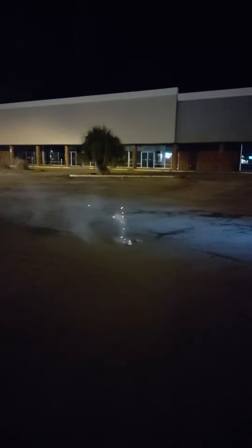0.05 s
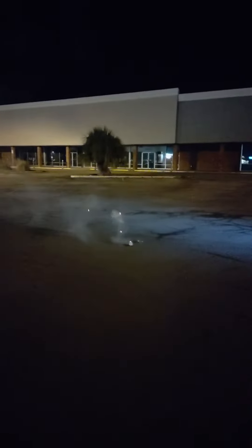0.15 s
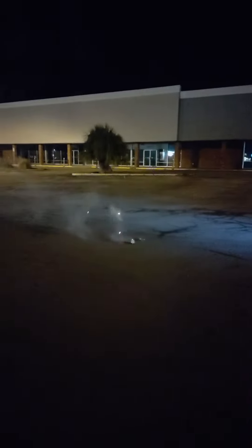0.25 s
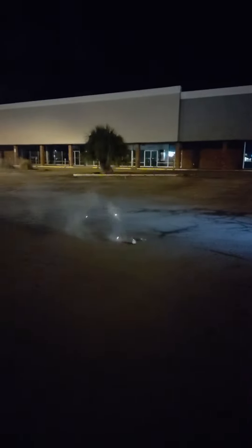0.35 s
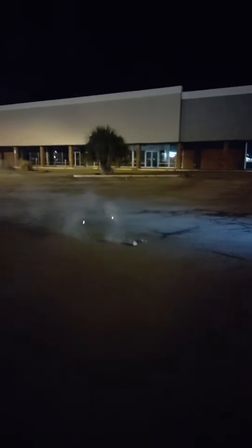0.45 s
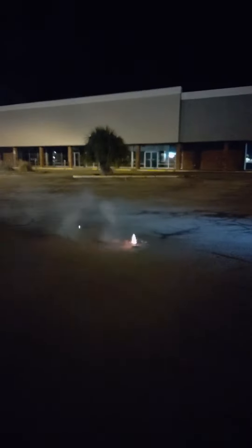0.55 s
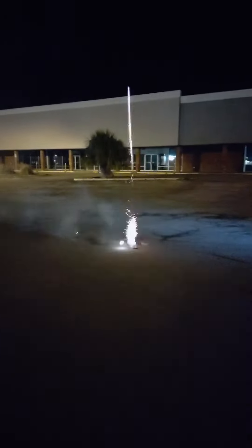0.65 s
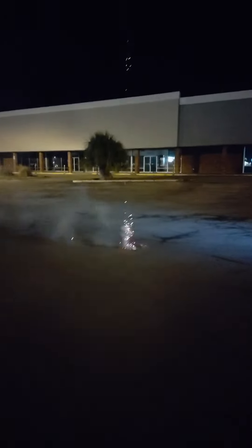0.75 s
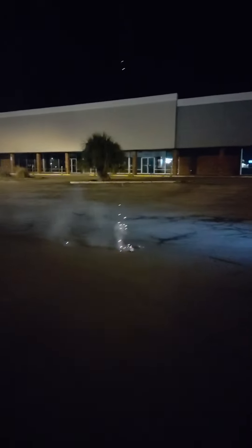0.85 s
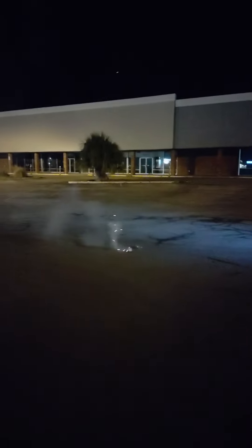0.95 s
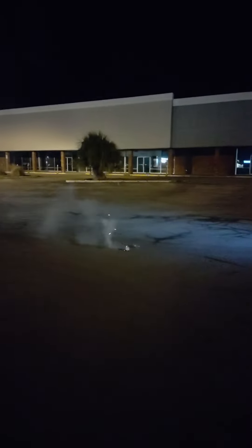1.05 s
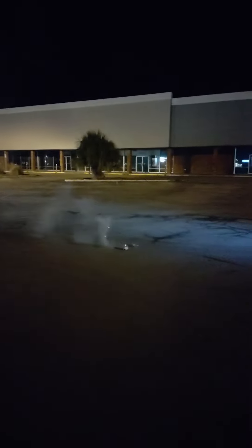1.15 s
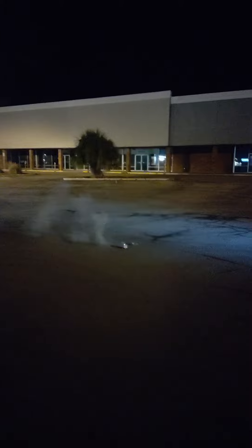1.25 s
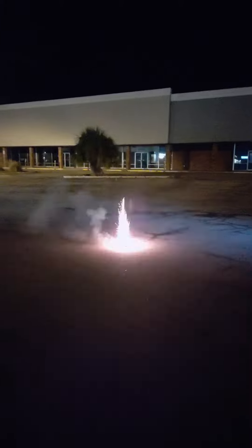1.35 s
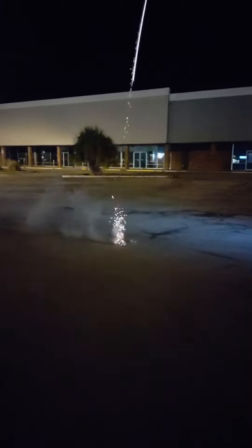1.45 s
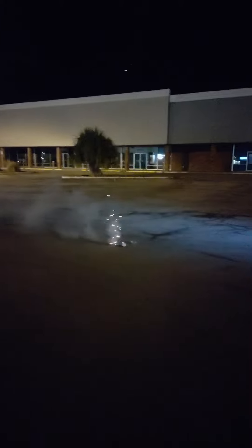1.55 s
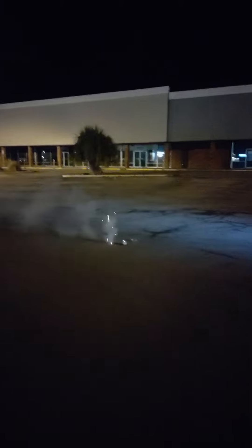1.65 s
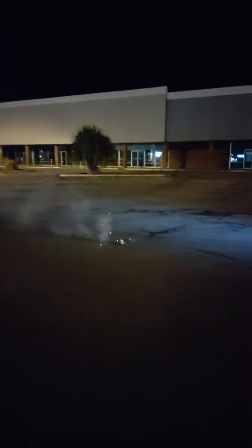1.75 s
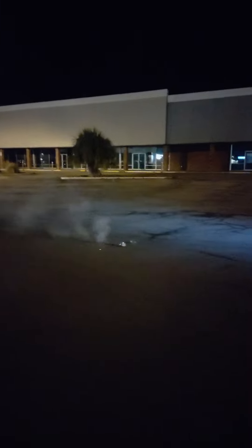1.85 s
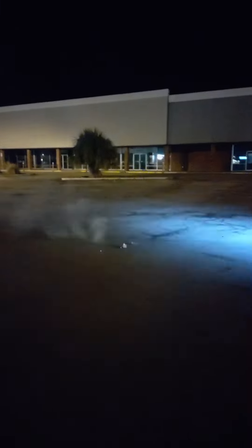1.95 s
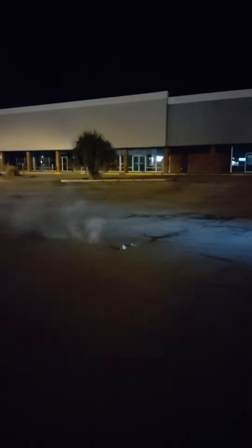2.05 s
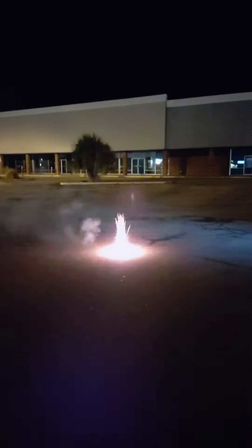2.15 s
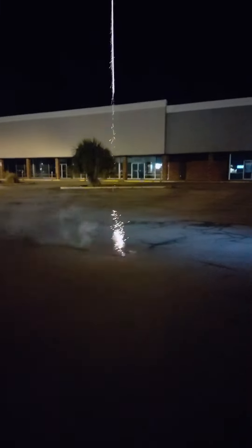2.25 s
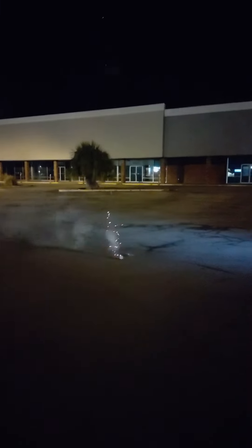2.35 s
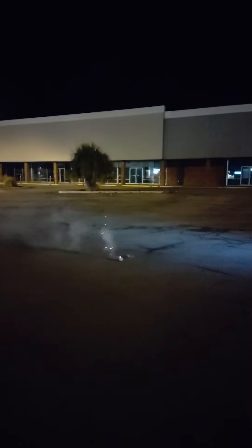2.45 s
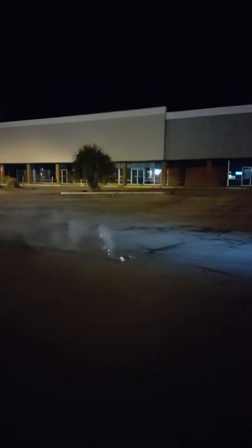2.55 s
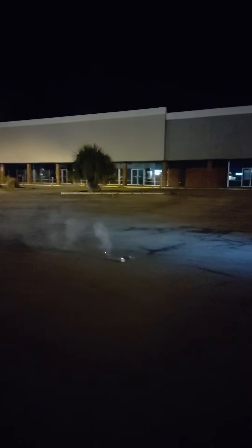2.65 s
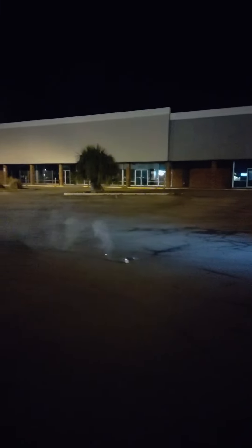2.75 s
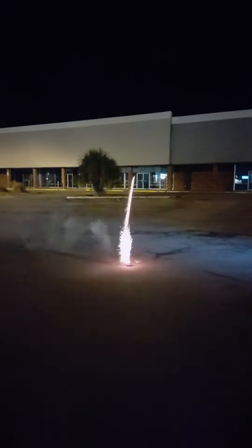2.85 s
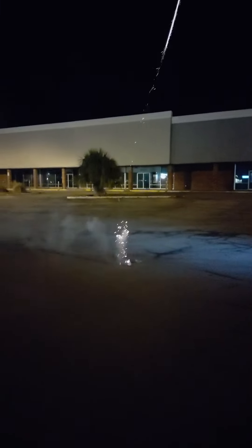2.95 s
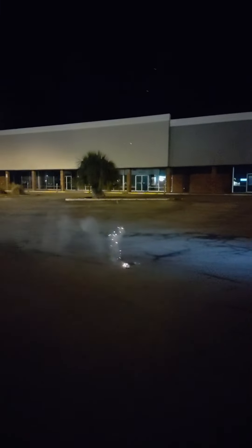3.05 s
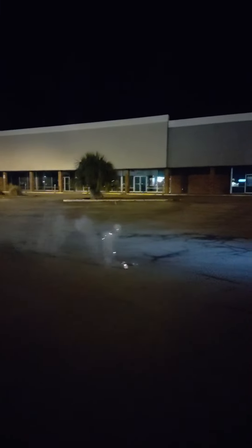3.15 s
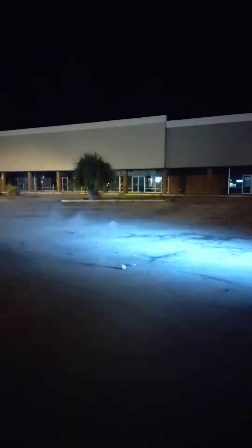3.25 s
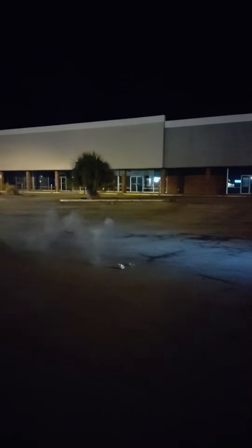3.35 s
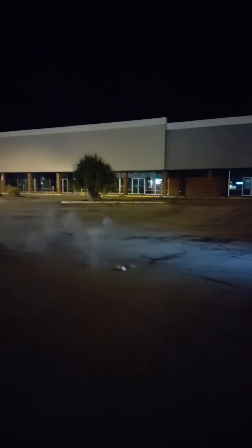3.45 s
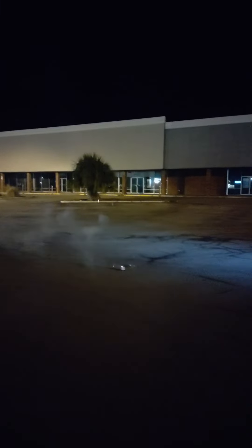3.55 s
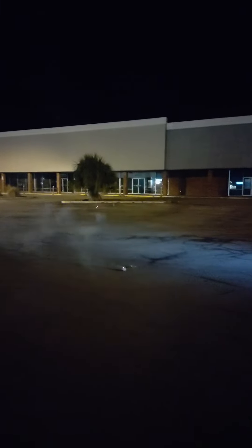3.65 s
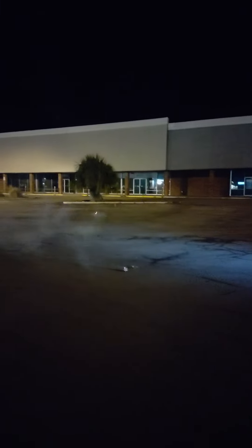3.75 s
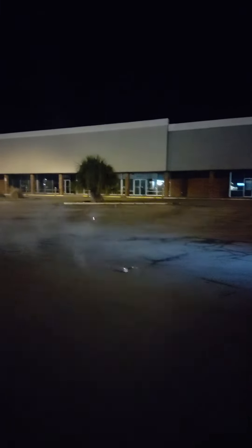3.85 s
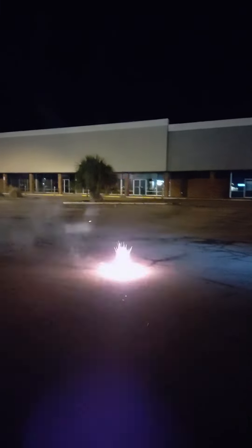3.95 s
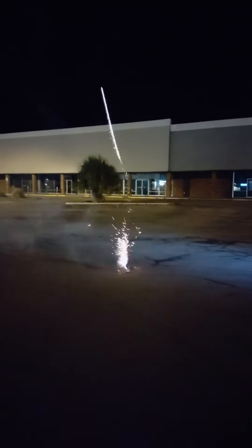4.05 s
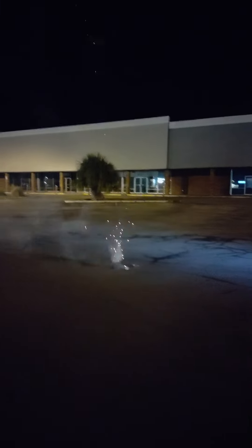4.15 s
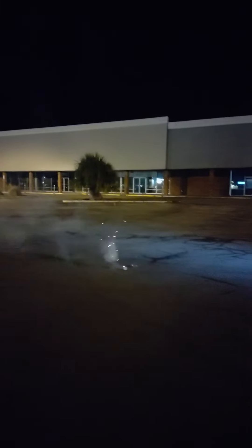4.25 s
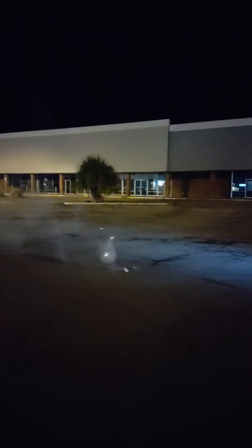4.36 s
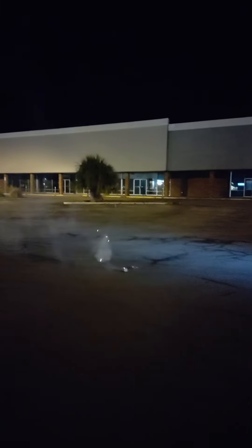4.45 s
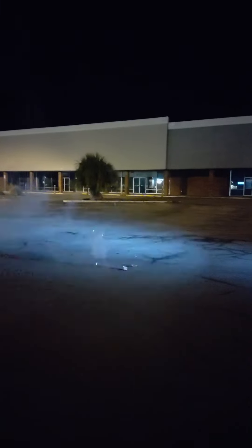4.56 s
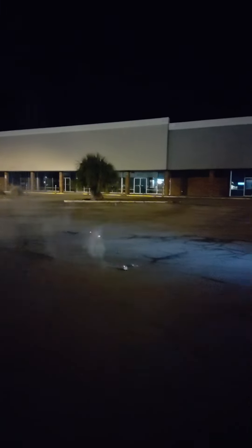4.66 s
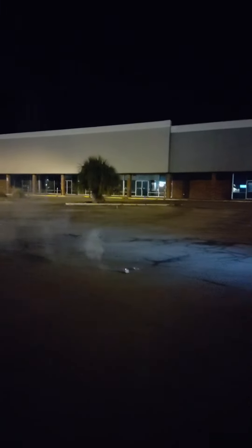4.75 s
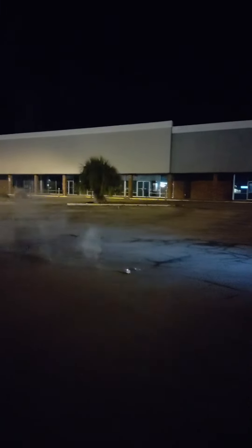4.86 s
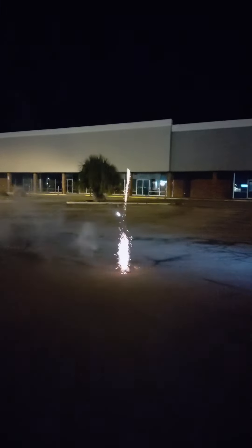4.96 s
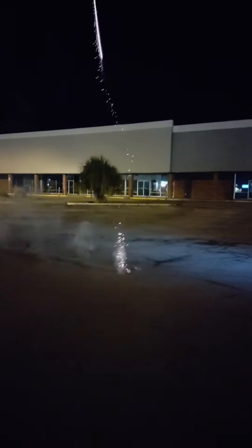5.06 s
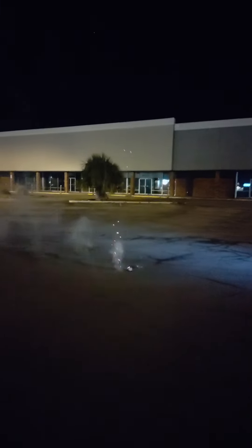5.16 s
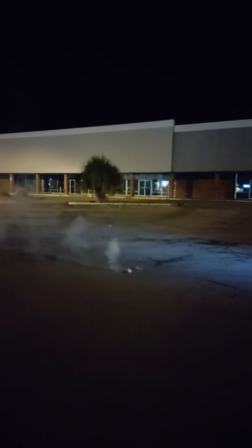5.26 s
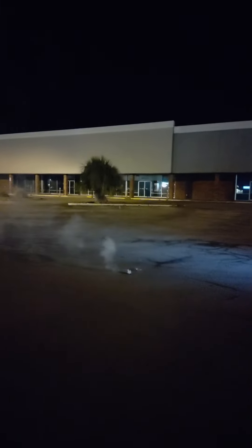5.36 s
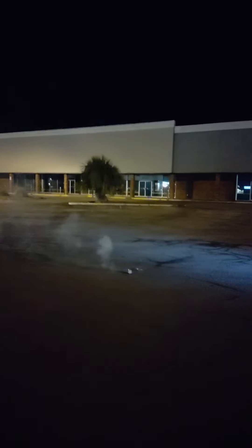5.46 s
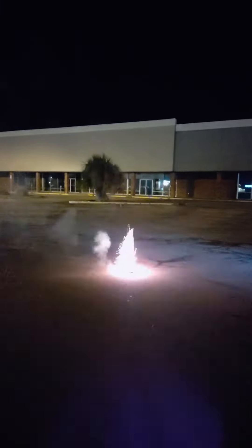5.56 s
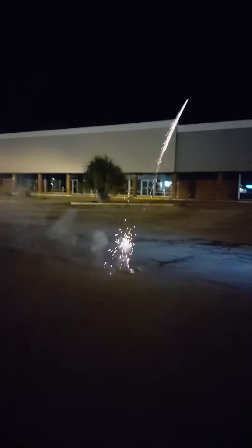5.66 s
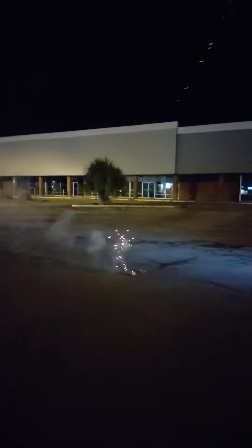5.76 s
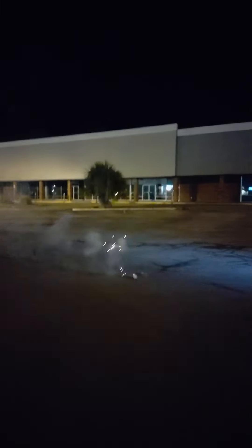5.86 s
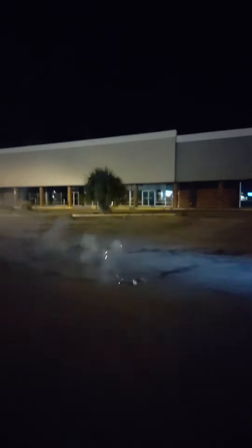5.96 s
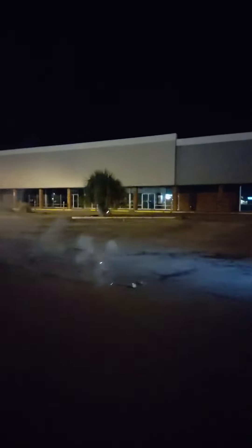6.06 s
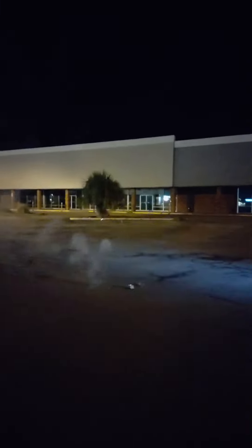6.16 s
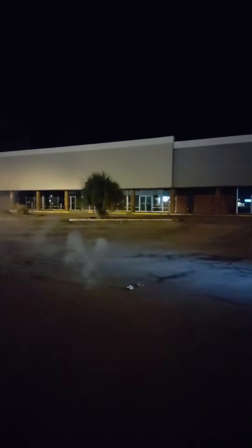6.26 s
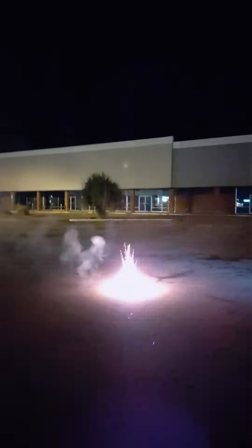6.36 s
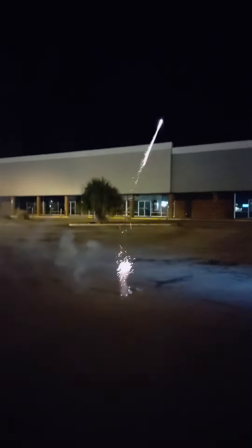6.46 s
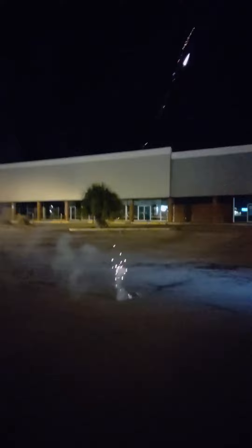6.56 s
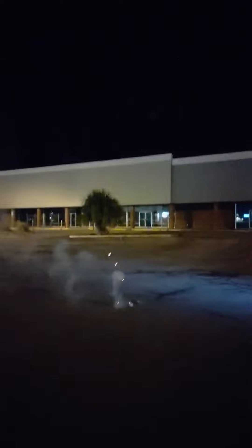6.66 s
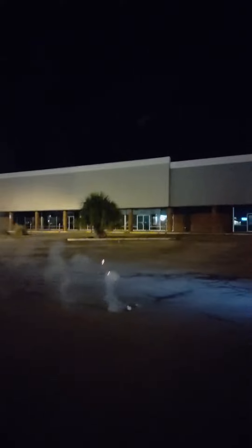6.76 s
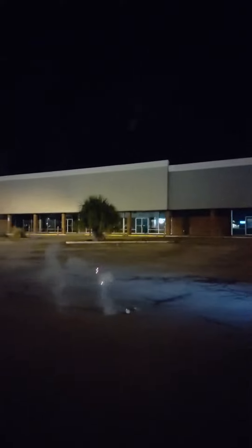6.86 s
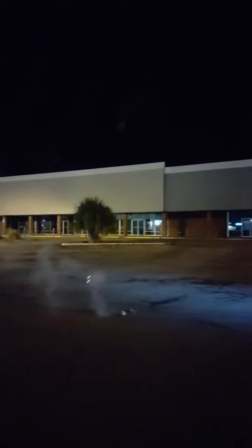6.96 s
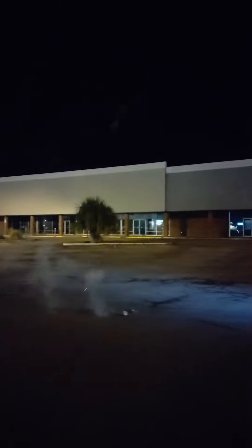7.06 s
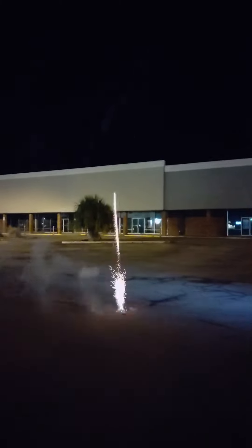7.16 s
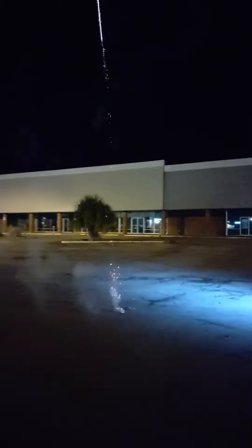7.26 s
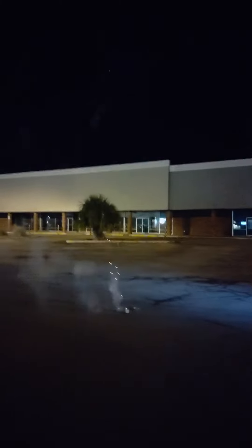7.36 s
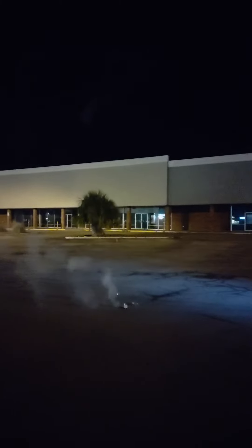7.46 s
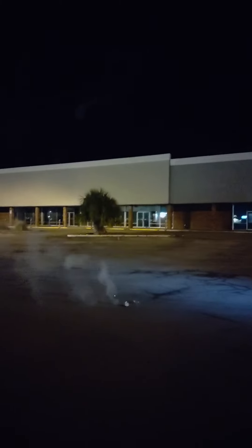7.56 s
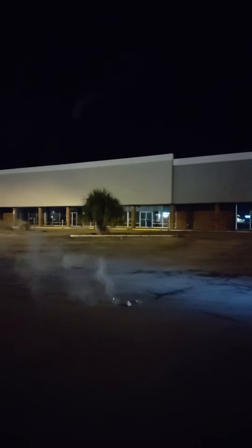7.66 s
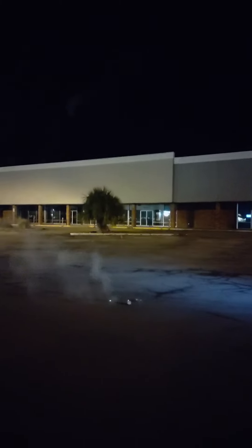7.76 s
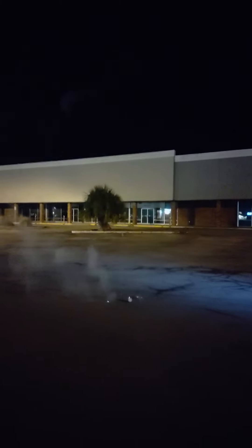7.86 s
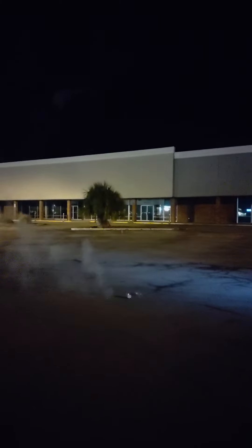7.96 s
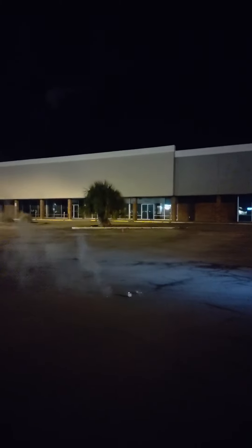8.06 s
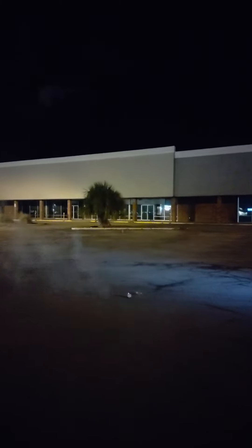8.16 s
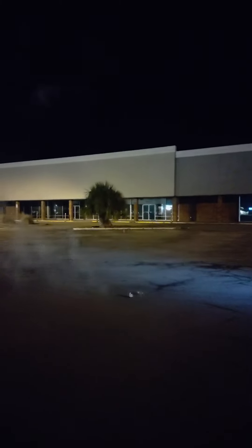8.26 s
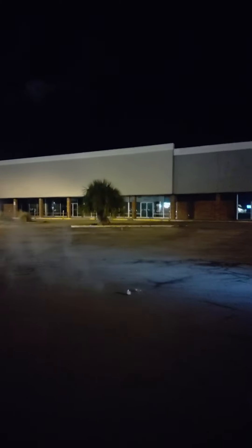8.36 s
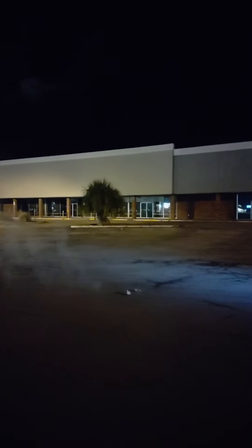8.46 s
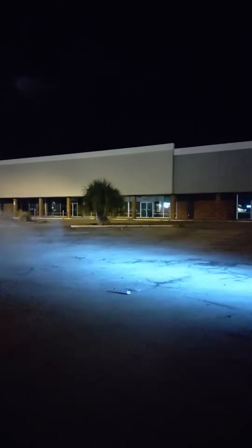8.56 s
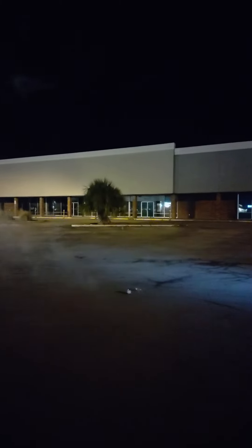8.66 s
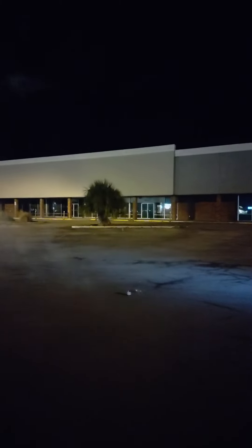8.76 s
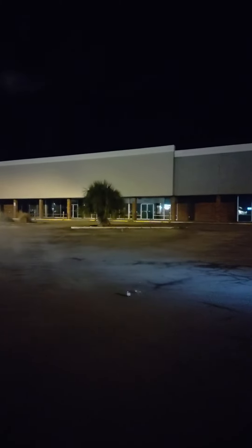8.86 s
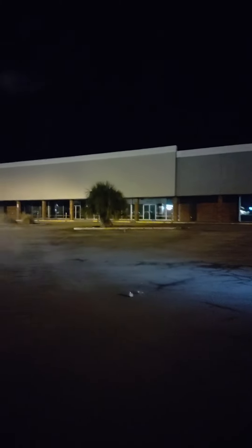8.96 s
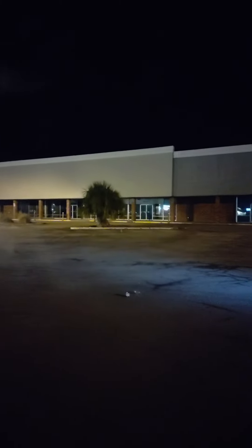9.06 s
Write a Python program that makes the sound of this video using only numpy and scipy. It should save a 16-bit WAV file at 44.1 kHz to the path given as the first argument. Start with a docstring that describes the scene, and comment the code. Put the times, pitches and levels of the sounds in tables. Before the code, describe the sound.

Night, open parking lot facing a long building, mono phone sound with levels ducking after each bang. It opens mid-whistle, with a crack and low boom at 0.1 s. Rockets then pop and scream upward at about 0.7, 1.45, 2.25, 2.9, 4.1, 5.0, 5.65, 6.45 and 7.2 s. Each whistle is a shrill, reedy, hissing tone near 3 kHz, lasting about a quarter to half a second, dropping in pitch as it climbs, sometimes ending in a faint squeal. Sharp cracks follow at about 0.97, 1.8, 2.7, 3.45, 4.04, 5.06, 5.95, 6.75 and 7.4 s; those near 4 and 5 s nearly coincide with launch. Wall slaps return a tenth of a second or so later, with grainy rolling tails. The 7.4 s bang is strongest, with a low boom and straggling echoes to 8.5 s; a weak crack at 8.4 s, then quiet low town wash.

```python
"""Whistling rockets leave a firework battery one after another in an empty parking lot at night.
Each pops out of its tube, screams upward on a note that falls by Doppler shift, and dies out.
Bursts crack high up: shaped pressure pulses, doubled by the asphalt, then noise echoes and slaps
off the buildings, some of them late. A low noise wash lies behind; a phone's limiter pumps under it all."""
import sys
import numpy as np
from scipy import signal
from scipy.fft import rfft, irfft
from scipy.io import wavfile
from scipy.ndimage import uniform_filter1d, minimum_filter1d, map_coordinates

SR = 44100
rng = np.random.default_rng(int(sys.argv[2]) if len(sys.argv) > 2 else 0)


def digitize_waveform(pressure):
    """Quantize a signal to 16-bit integers and store it at the path in sys.argv[1].

    Rows of a 2-D input are taken as channels; values are limited to [-1, 1].
    """
    field = np.atleast_2d(pressure).T
    bounded = np.clip(field, -1, 1)
    quanta = np.round(bounded * 32767).astype(np.int16)
    wavfile.write(sys.argv[1], SR, quanta)


N = 402633

# rockets, ages from launch: (launch [s], pop [dB], ignition wait [s], burn-out age [s], dying time [s],
#   pitch [Hz], top speed [Mach], lift-off age [s], whistle [dB], dying note [dB], echo [dB], octave [dB],
#   half-pitch rattle [dB], age at strongest rattle [s], hiss [dB],
#   lean away from the buildings [factor], sag before burn-out [share of pitch])
ROCKETS = [ (-.17, -10, .01, 0.34, 0.29, 3156, 0.23, .11, -0.5, -24.5, 2, -4.5, -10.5, 0.21, -12.5, 1.83, 0.0039),
           (.687, 1, 0.0071, 0.42, 0.14, 3188, 0.23, 0.08, 1, -22, 1.5, -1.5, -11, 0.24, -15, 1.35, 0.011),
           (1.4475, 2.5, 0.0087, 0.38, 0.13, 3077, 0.22, 0.076, 2.5, -22.5, 1, -.5, -17, .27, -15, 0.97, 0.0057),
           (2.2654, 3, 0.0071, 0.21, 0.13, 3055, 0.18, 0.074, 4.5, -12, 0, -.5, -11, 0.16, -17, 1.06, 0.0042),
           (2.927, 3.5, 0.0065, 0.3, 0.2, 3080, 0.15, .05, 4.5, -20.5, 1, -3, -33.5, 0.028, -15, .8, .01),
           (4.0754, 10.5, 0.015, 0.26, 0.04, 3082, 0.19, 0.047, 2.5, -3.5, -2, -2.5, -7, 0.19, -18, 1.3, 0.0061),
           (4.997, -7, .012, .252, .008, 3160, .175, 0.13, 1, -11, 2, -2.5, -9, 0.066, -14.5, 2.6, .07),
           (5.648, -8, 0.014, .261, 0.011, 3185, 0.15, 0.031, 6, -9.5, -1, -1, -23, 0.078, -18.5, 1.04, 0.094),
           (6.451, -4, 0.0089, 0.13, 0.016, 3065, 0.14, 0.054, 2.5, -11.5, -2, -0.5, -18, 0.054, -19.5, 0.22, 0.0053),
           (7.206, -2, 0.013, 0.31, 0.26, 3117, 0.2, 0.072, 7, -23, -3, -2, -41.5, 0.046, -13, 1.7, 0.0071)]
# bursts in the air: (time [s], crack [dB], rolling echo [dB], low boom [dB],
#   delay of the slap off the buildings [s], slap [dB])
BURSTS = [(.127, 21, -19.5, -11.5, 0.14, -2.5), (0.9653, 23.5, -25.5, -53.5, 0.14, -10),
          (1.8064, 14.5, -26.5, -34, .1222, -7), (2.7143, 20.5, -27, -60.5, 0.093, -8.5),
          (3.455, 20, -28, -24, 0.14, -9), (4.0434, 23, -26, -26.5, 0.14, -6.5),
          (5.057, 20, -33.5, -67.5, 0.14, -17.5), (5.9536, 22, -21, -63.5, .1737, -6),
          (6.7499, 18, -28, -59, 0.18, -30), (7.3761, 36, -20, -13.5, 0.11, 0.5),
          (8.379, 8, -32, -43, 0.14, -12.5)]
# crack spectrum: (frequency [Hz], relative density [dB per Hz])
CRACK_COLOUR = [(30, -74), (120, 1), (500, 2.5), (1200, 6.5), (1800, 13), (2800, 6.5), (4500, 9), (6000, 3),
                (7200, 6), (8500, -22)]
GROUND_S = 0.0084  # lag of the bounce off the asphalt for a sound overhead
EDGE_HZ = 8270  # upper band edge


def amp(db):
    """Decibels to amplitude ratio."""
    return 10 ** (np.asarray(db) / 20)


def evened(x):
    """Scales x to rms 1."""
    return x / np.sqrt(np.mean(x ** 2) + 1e-20)


def read(points, hz):
    """Reads a table of values by frequency, interpolated over log frequency."""
    f, value = np.transpose(points)
    return np.interp(np.log(hz + 1), np.log(f + 1), value)


def add(mix, start_s, sound):
    """Mixes a sound in at start_s, cut at both ends of the mix."""
    at = round(start_s * SR)
    part, sound = mix[max(at, 0):], sound[max(-at, 0):]
    part[:len(sound)] += sound[:len(part)]


def coloured(x, points):
    """Weights the spectrum of x by a colour table, at rms 1."""
    hz = np.fft.rfftfreq(len(x), 1 / SR)
    return evened(irfft(rfft(x) * amp(read(points, hz)), len(x)))


def wander(count, hz):
    """Low-passed noise of rms 1 that moves about hz times a second."""
    f = np.fft.rfftfreq(count, 1 / SR)
    return evened(irfft(rfft(rng.standard_normal(count)) / (1 + (f / hz) ** 4), count))


def shock(points, ripple_db, size=2048):
    """Minimum-phase pressure pulse of peak 1, its colour a little different each time."""
    hz = abs(np.fft.fftfreq(size, 1 / SR))
    ripple = np.interp(hz, np.linspace(0, EDGE_HZ, 16), rng.standard_normal(16))
    log_gain = np.log(amp(read(points, hz) + ripple_db * ripple))
    pulse = np.fft.ifft(np.exp(np.conj(signal.hilbert(log_gain)))).real
    return pulse / abs(pulse).max()


def scattered(pulse, scatter_db, t60_s):
    """A pulse followed by a short decaying spray of small reflections."""
    t = np.arange(SR // 5) / SR
    taps = rng.standard_normal(len(t)) * amp(-60 * t / t60_s)
    taps *= amp(scatter_db) / np.linalg.norm(taps)
    taps[0] = 1
    return signal.fftconvolve(taps, pulse)


def rolling(x, arrive_s, rise_s, near_db):
    """Shapes noise into the lot's echo: little until the buildings answer, then the treble dies first."""
    # reverberation of the lot: (frequency [Hz], t60 [s])
    lot_t60 = [(100, 1.8), (500, 1.94), (1800, 1.44), (3000, 1.15), (5000, 0.86), (8000, 0.66)]
    hz, t, z = signal.stft(x, SR, nperseg=256)
    swell = amp(near_db) + 1 / (1 + np.exp((arrive_s - t) / rise_s))
    decay = amp(-60 * np.maximum(t - arrive_s, 0) / read(lot_t60, hz)[:, None])
    return signal.istft(z * swell * decay, SR, nperseg=256)[1]


def doppler(x, mach):
    """Stretches a sound whose source moves away at the speed mach."""
    return map_coordinates(x, [np.cumsum(1 / (1 + mach))], order=3)


def night(level_db=-48.5, swell_db=-7.0):
    """The low wash of the town around the lot: coloured noise of wandering level."""
    # town noise spectrum: (frequency [Hz], relative density [dB per Hz])
    night_colour = [(20, -18.5), (60, 1), (110, 6), (300, -3), (600, -6.5), (1200, -4.5), (1750, 1),
                    (2400, -12), (4000, -21), (8000, -32)]
    return amp(level_db + swell_db * wander(N, 5.3)) * coloured(rng.standard_normal(N), night_colour)


def slaps(bounce=0.38, glint_db=-9):
    """Duller, smeared cracks: echoes of the bursts off the buildings, each with its twin off the asphalt."""
    # slap spectrum: (frequency [Hz], relative density [dB per Hz])
    slap_colour = [(40, -20.5), (200, -7.5), (600, 0.5), (1200, 3.5), (1800, 15.5), (2500, -9),
                   (4500, -12.5), (8000, -45)]
    # three walls return every burst's slap: (further delay [s], level [dB])
    slap_walls = [(0, -1.5), (.034, -5), (0.397, -14.5)]
    # further single slaps, late echoes of the bursts off other walls: (time [s], level [dB])
    late_slaps = [(0.6037, -16.5), (7.6212, -8), (7.744, -15), (7.9404, -10.5), (7.8812, -17.5),
                  (8.232, -26), (8.266, -23), (8.4765, -14.5)]
    echoes = []
    for burst_s, *_, delay_s, slap_db in BURSTS:
        for further_s, wall_db in slap_walls:
            echoes.append((burst_s + delay_s + further_s, slap_db + wall_db))
    out = np.zeros(N)
    for start_s, db in echoes + late_slaps:
        for lag_s, share in ((0, 1), (GROUND_S, bounce)):
            slap = scattered(shock(slap_colour, ripple_db=3), scatter_db=2, t60_s=0.025)
            add(out, start_s + lag_s, share * amp(db) * slap)
        # flat walls keep some treble
        glint = scattered(shock(CRACK_COLOUR, ripple_db=7.5), scatter_db=-1.5, t60_s=0.027)
        add(out, start_s, amp(db + glint_db) * glint)
    return out


def bursts(bounce=0.99, grain_db=1.5, lumps_db=2, boom_hz=100, boom_t60_s=0.62, thump_db=12):
    """A crack, its twin off the asphalt, a grainy echo from the buildings and a low boom, often faint."""
    # rolling echo spectrum: (frequency [Hz], relative density [dB per Hz])
    roll_colour = [(30, -30), (120, -11), (330, -16.5), (600, -6), (1200, -5.5), (1850, 8), (2400, -8.5),
                   (4500, -2.5), (6000, -8.5), (7500, -7), (8500, -28)]
    out, t = np.zeros(N), np.arange(2 * SR) / SR
    for burst_s, crack_db, roll_db, boom_db, *_ in BURSTS:
        for lag_s, share in ((0, 1), (GROUND_S, bounce)):
            crack = scattered(shock(CRACK_COLOUR, ripple_db=4.0), scatter_db=-10.5, t60_s=0.045)
            add(out, burst_s + lag_s, share * amp(crack_db) * crack)
        unevenness_db = grain_db * wander(len(t), 330) + lumps_db * wander(len(t), 69)
        facets = rng.standard_normal(len(t)) * amp(unevenness_db)
        roll = rolling(coloured(facets, roll_colour), arrive_s=0.097, rise_s=0.0019, near_db=-7)
        add(out, burst_s, amp(roll_db) * roll)
        # the boom starts with a thump and drones on over a faint rumble
        drone = np.sin(2 * np.pi * boom_hz * t + 0.35 * wander(len(t), 15))
        drone *= 1 + 0.3 * wander(len(t), 14)
        rumble = 0.13 * wander(len(t), 90)
        thump = 1 + amp(thump_db) * np.exp(-t / 0.01)
        add(out, burst_s, amp(boom_db - 60 * t / boom_t60_s) * thump * (drone + rumble))
    return out


def launches():
    """The lift charge pops each rocket out of its tube: a scattered pressure pulse."""
    # pop spectrum: (frequency [Hz], relative density [dB per Hz])
    pop_colour = [(30, -39.5), (150, -6.5), (550, 2.5), (900, -1), (1800, 5), (2800, -9), (5000, -8),
                  (8000, -26.5)]
    out = np.zeros(N)
    for launch_s, pop_db, *_ in ROCKETS:
        pop = scattered(shock(pop_colour, ripple_db=4.5), scatter_db=-5.5, t60_s=0.1)
        add(out, launch_s, amp(pop_db) * pop)
    return out


def jet(hz, octave_db, rattle_db, hiss_db, blur_rad=0.053, flicker_db=4):
    """The pulsing flame in a rocket's tube: a tone, its overtones, a reedy rattle and exhaust hiss."""
    # exhaust spectrum: (frequency [Hz], relative density [dB per Hz])
    hiss_colour = [(100, -43.5), (1200, -20.5), (2200, -8.5), (3000, -11), (4500, 8), (6000, 5.5),
                   (7500, 5.5), (8500, -21.5)]
    count = len(hz)
    phase = 2 * np.pi * np.cumsum(hz) / SR
    uneven = blur_rad * wander(SR, 310)[:count]
    overtones = np.sin(2 * phase + uneven) + 0.03 * np.sin(3 * phase + uneven)
    # alternate strong and weak puffs put rough lines halfway between the harmonics
    half = phase / 2 + 0.3 * wander(SR, 200)[:count]
    rattle = 0.07 * np.sin(half) + np.sin(half + phase) + 0.7 * np.sin(half + 2 * phase)
    rattle *= amp(rattle_db + flicker_db * wander(SR, 24)[:count])
    hiss = coloured(rng.standard_normal(SR), hiss_colour)[:count]
    hiss *= amp(hiss_db + 2 * wander(SR, 71)[:count])
    return np.sin(phase) + amp(octave_db) * overtones + rattle + hiss


def whistle(rocket, climb_s=0.19, speed_up_s=0.225, bounce=0.66):
    """One rocket's scream heard from below, the same spilling sideways to the buildings, and its speed."""
    (_, _, wait_s, burn_s, dying_s, pitch_hz, top_mach, lift_s, whistle_db, dying_db, echo_db, octave_db,
     rattle_peak_db, rattle_age_s, hiss_db, _, sag) = rocket
    start_db, loudest_s, fade_db_per_s = -5, 0.12, 79
    dying_rise, dying_rise_s, dying_db_per_s = 0.12, 0.009, 106
    squeal_hz, squeal_s, jitter, sputter, sputter_s = 620, 0.0077, 0.0067, 0.03, 0.024
    last_squeal_hz, last_squeal_db, last_squeal_s = 625, -3.5, 0.01
    stall_s, burn_drift, rattle_s = 0.009, 0.003, 0.066
    beam_db, side_fade, side_drift = -9, 0.74, 0.0099

    age = np.arange(3 * SR // 4) / SR
    lit = np.maximum(age - wait_s, 0)
    flown = np.maximum(age - lift_s, 0)
    spent = np.maximum(age - burn_s, 0)
    left = np.maximum(burn_s + dying_s - age, 0)
    slope = (age / climb_s) ** 1.5  # height over ground distance
    low = 1 / (1 + slope ** 2)  # 1 at the ground, toward 0 overhead
    edges = np.clip(np.minimum(lit, left) / 0.004, 0, 1)
    # the note holds in the tube; its fall after lift-off is Doppler shift as the rocket gathers speed
    mach = top_mach * np.tanh(flown / speed_up_s)

    # swells as the nozzle turns toward the ground, fades with height, dies away when the fuel runs out
    dying = 1 - np.exp(-spent / dying_rise_s)
    swell_db = start_db * (1 - flown / loudest_s)
    fade_db = fade_db_per_s * (loudest_s - flown)
    burning_db = whistle_db + np.minimum(swell_db, fade_db)
    spent_db = dying_db - dying_db_per_s * spent
    going_out = np.exp(-left / last_squeal_s)
    level_db = (1 - dying) * burning_db + dying * spent_db + last_squeal_db * going_out

    # squeals and sputters on ignition, snaps to pitch, jumps up when spent, squeals as it goes out
    squeal = squeal_hz * np.exp(-(lit / squeal_s) ** 4) + last_squeal_hz * going_out
    waver = 1 + (jitter + sputter * np.exp(-lit / sputter_s)) * wander(len(age), 440)
    drift = 1 + burn_drift * wander(len(age), 24)
    # the flame falters and the note sags just before burn-out
    stall = sag * np.exp(-((age - burn_s) / stall_s + 0.5) ** 2)
    hz = (pitch_hz * (1 - stall + dying_rise * dying) + squeal) * waver * drift
    # the reedy rattle is strong for a part of the burn only
    rattle_db = rattle_peak_db - 16 * (1 - np.exp(-((age - rattle_age_s) / rattle_s) ** 2))

    # the overtones beam down from the nozzle, so they grow as the rocket climbs
    direct = jet(hz / (1 + mach), octave_db + beam_db * low ** 4, rattle_db, hiss_db)
    direct *= edges * amp(level_db)
    # the bounce off the asphalt lags more with height and beats against the direct sound
    lag_s = GROUND_S * slope / np.hypot(1, slope)
    mirrored = map_coordinates(direct, [(age - lag_s) * SR], order=3)
    wobble = 1 + side_drift * wander(len(age), 20.14)  # the rocket wobbles on its way up
    spill = jet(hz * wobble, octave_db - 4.5, rattle_db - 0.5, hiss_db - 1.0)
    spill *= edges * amp(echo_db + side_fade * level_db)
    return direct + bounce * mirrored, spill, mach


def whistles(wet_db=-25.0, near_hz=6200, dulling_s=0.34, lot_doppler=0.15):
    """All the whistles, with their echoes off the walls and the lingering ring of the lot."""
    # whistle echoes: (delay [s], level [dB], Doppler shift of this wall [share])
    walls = [(.03, -25.5, .35), (0.067, -24, 0.18), (0.156, -21, 0.26), (0.301, -32, .15),
             (0.566, -35.5, .25)]
    direct_mix, ring, echoes = np.zeros((3, N))
    for rocket in ROCKETS:
        launch_s, *_, lean, _ = rocket
        direct, spill, mach = whistle(rocket)
        add(direct_mix, launch_s, direct)
        # the buildings stand side-on to the climb: a part of the pitch fall, scaled by the lean
        add(ring, launch_s, doppler(spill, lean * lot_doppler * mach))
        for delay_s, db, share in walls:
            # a longer way loses more treble
            air = signal.butter(2, near_hz / (1 + delay_s / dulling_s), fs=SR)
            echo = signal.lfilter(*air, doppler(spill, min(lean * share, 1) * mach))
            add(echoes, launch_s + delay_s, amp(db) * echo)
    tail = rolling(rng.standard_normal(2 * SR), arrive_s=0.15, rise_s=0.02, near_db=-5.0)
    lingering = amp(wet_db) * signal.fftconvolve(ring, tail / np.linalg.norm(tail))[:N]
    return direct_mix + echoes + signal.lfilter(*signal.butter(2, 4300, fs=SR), lingering)


def scene():
    """One microphone, the same in both channels."""
    return np.tile(night() + slaps() + bursts() + launches() + whistles(), (2, 1))


def record(dry, limit_db=-9.5, recover_db_per_s=170, size=88):
    """A limiter ducks all under each loud sound and soon recovers; peaks round off; the band ends sharply."""
    power_db = 10 * np.log10(abs(uniform_filter1d(dry[0] ** 2, size)) + 1e-12)
    fall_db = np.arange(N) * recover_db_per_s / SR
    held_db = np.maximum.accumulate(power_db + fall_db) - fall_db
    over_db = np.maximum(held_db - limit_db, 0)
    gain_db = uniform_filter1d(minimum_filter1d(-over_db, 2 * size), 2 * size)
    ducked = dry * amp(gain_db)
    rounded = ducked / (1 + (ducked / 0.8) ** 8) ** (1 / 8)
    low_pass = signal.firwin(161, EDGE_HZ, window=("kaiser", 8), fs=SR)
    return signal.oaconvolve(rounded, low_pass[None], "same")


dry = scene()
out = record(dry)
digitize_waveform(out)
```